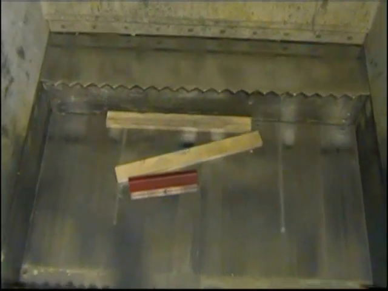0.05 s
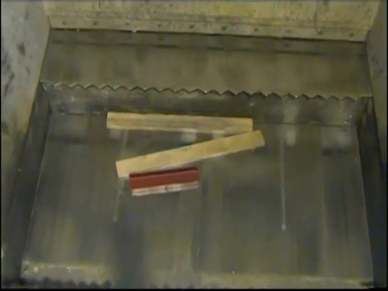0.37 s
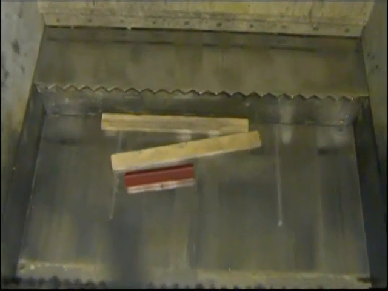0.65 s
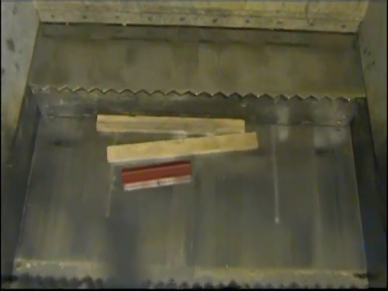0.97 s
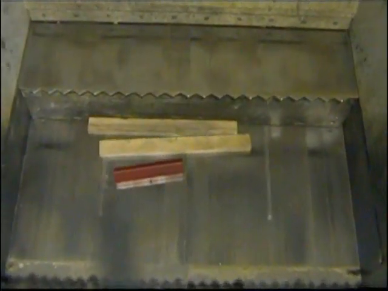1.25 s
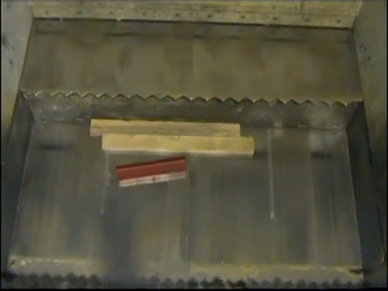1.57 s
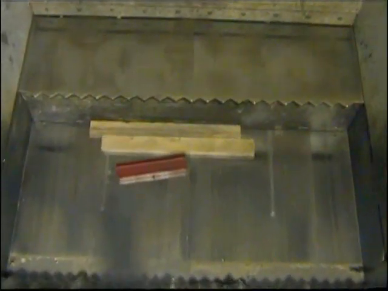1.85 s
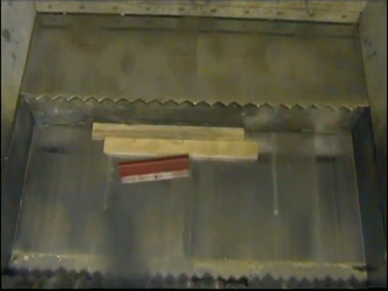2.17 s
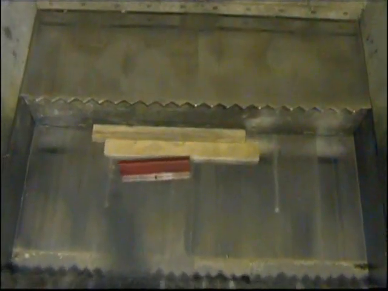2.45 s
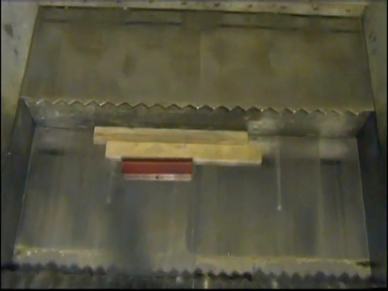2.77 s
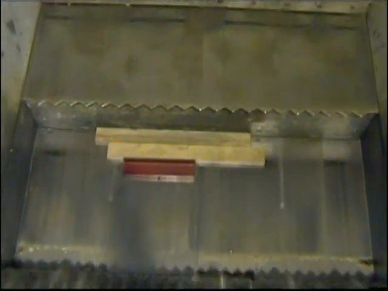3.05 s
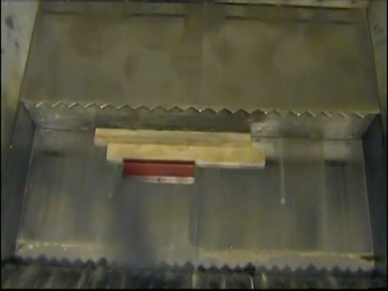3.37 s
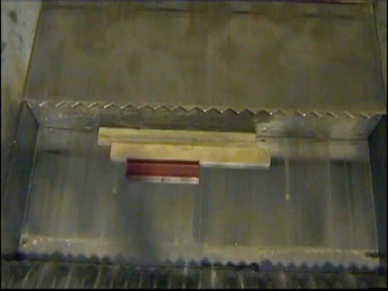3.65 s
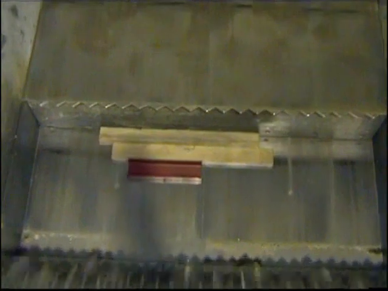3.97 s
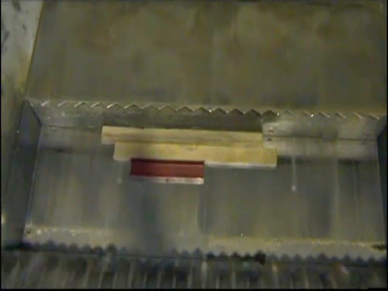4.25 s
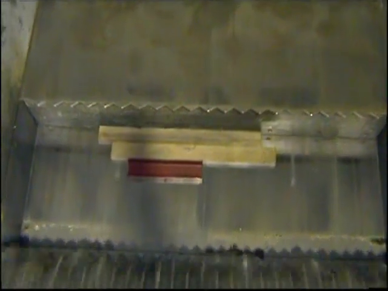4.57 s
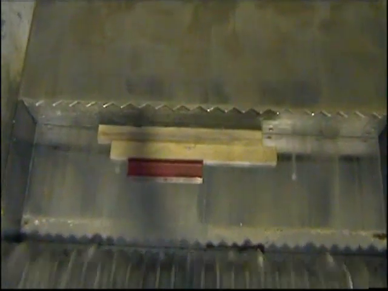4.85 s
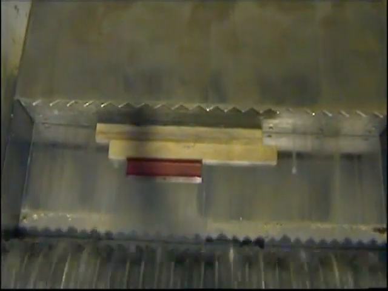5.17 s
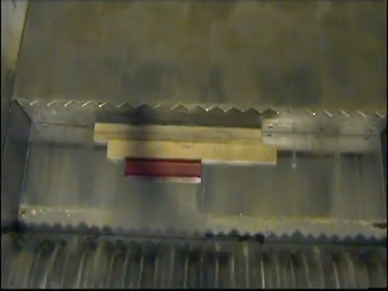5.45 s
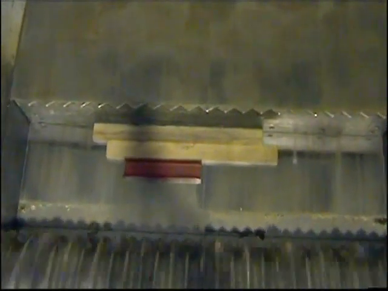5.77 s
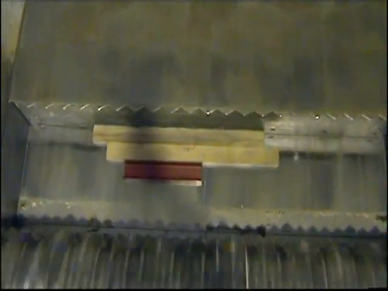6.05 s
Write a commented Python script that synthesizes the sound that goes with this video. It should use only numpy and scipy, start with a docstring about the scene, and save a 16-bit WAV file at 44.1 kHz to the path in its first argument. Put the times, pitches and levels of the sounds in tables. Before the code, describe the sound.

Heard close over a steel hopper in a plant, a shredder's rotor turns with a steady rumble and a fast, regular metallic scraping that makes the housing ring hollowly. A wavering gear hum, a high throbbing motor whine and tiny irregular squeaks run through it. In the last seconds the machine works a little harder and the rumble thickens slightly.

```python
"""The rotor of an industrial shredder rumbles at 170 turns a minute, heard from above the steel hopper.
Twice a turn it rubs on steel, and the friction drives the housing's resonances. Gear teeth hum at their
meshing rate, the motor's inverter whines, a dry bearing squeaks, and the hall rumbles behind.
The machine works harder in the last seconds, as its ram slides wood toward the rotor."""
import sys
import numpy as np
from scipy import signal
from scipy.fft import rfft, irfft
from scipy.io import wavfile

SR = 44100
rng = np.random.default_rng(int(sys.argv[2]) if len(sys.argv) > 2 else 0)


def generate_wav(sig):
    """Save sig (samples, or channels by samples) to the path in sys.argv[1] as 16-bit PCM at SR."""
    pcm = np.round(np.clip(np.atleast_2d(sig).T, -1, 1) * 32767).astype(np.int16)
    wavfile.write(sys.argv[1], SR, pcm)


N = 273420
T = np.arange(N) / SR
FREQS = np.maximum(np.arange(N // 2 + 1) * SR / N, 1)
TURN_S = .3529


def undb(db):
    """Amplitude ratio of a level in decibels."""
    return 10 ** (np.asarray(db) / 20)

def unit(x):
    """Normalisation to an rms of 1."""
    return x / np.sqrt(np.mean(x ** 2))

def curve(table):
    """Linear interpolation of (seconds, value) rows at every sample."""
    return np.interp(T, *np.transpose(table))

def over_hz(points):
    """Interpolation of (Hz, value) rows along a logarithmic frequency axis."""
    hz, value = np.transpose(points)
    return np.interp(np.log(FREQS), np.log(hz), value)

def colour(x, points):
    """Filtering by a spectral envelope, at unit rms."""
    return unit(irfft(rfft(x) * undb(over_hz(points)), N))

def resonate(x, modes):
    """Forced response of damped modes (Hz, bandwidth in Hz, relative dB), at unit rms."""
    response = sum(undb(db) / (1 + 1j * (FREQS / hz - hz / FREQS) * hz / width)
                   for hz, width, db in modes)
    cutoff_hz = 1.4 * max(hz for hz, width, db in modes)
    return unit(irfft(rfft(x) * response / (1 + (FREQS / cutoff_hz) ** 8), N))

def drift(rate_hz):
    """Low-pass Gaussian noise: a random fluctuation of unit rms."""
    return unit(irfft(rfft(rng.standard_normal(N)) * np.exp(-(FREQS / rate_hz) ** 2), N))

def tone(hz, waver):
    """A sinusoid under slow random phase and amplitude modulation."""
    phase = 2 * np.pi * (hz * T + rng.random()) + waver * drift(17)
    return np.sqrt(2) * np.sin(phase) * undb(6.9 * waver * drift(2.6))

def rotor_tones(orders):
    """Rotational orders: tones at whole multiples of the turning rate."""
    return sum(undb(db) * tone(round(order) / TURN_S, waver=.35) for order, db in orders)

def roughness(memory, fresh):
    """Quasi-periodic force: bumps recur each turn with correlation `memory`, mixed with fresh noise."""
    size = round(TURN_S * SR)
    turns = rng.standard_normal((N // size + 1, size))
    keep = min(memory, .995)
    for k in range(1, len(turns)):
        turns[k] = keep * turns[k - 1] + np.sqrt(1 - keep ** 2) * turns[k]
    return np.sqrt(1 - fresh) * turns.ravel()[:N] + np.sqrt(fresh) * rng.standard_normal(N)

def contact(age, rise, hold, decay):
    """Contact pressure: linear rise, plateau and exponential decay, timed in seconds."""
    return np.clip(age / rise, 0, 1) * np.exp(-np.maximum(age - rise - hold, 0) / decay)

def bump(offset, width):
    """A Gaussian pulse of height 1."""
    return np.exp(-(offset / width) ** 2)

def load(midpoint_s=4.35, rise_s=.9):
    """Mechanical load: a ramp from 0 at idle to 1 with the ram close to the rotor."""
    return np.clip((T - midpoint_s) / rise_s + .5, 0, 1)


# Spectrum of the rumble. Each row: frequency in Hz, relative density in dB.
RUMBLE_SPECTRUM = [(100, -15.5), (170, -1), (250, 7), (450, 7.5), (750, 6.5), (1000, 4), (1600, 3.5),
                   (2500, -4.5), (3700, -3.5), (4800, -13), (5600, -28), (6150, -5), (6500, -66),
                   (7800, -66)]
# Low modes of the housing. Each row: frequency in Hz, bandwidth in Hz, relative gain in dB.
LOW_MODES = [(316.6, 12, 2), (349, 25, 13.5), (395.4, 14, 6)]

def rotor():
    """Forced vibration: the rotor shakes the housing into a rumble and a drone that grow with load."""
    rumble = colour(roughness(memory=.927, fresh=.59), RUMBLE_SPECTRUM)
    drone = resonate(roughness(memory=.88, fresh=.074), LOW_MODES)
    return rumble * undb(-29.5 + 1.5 * load()) + drone * undb(-37.5 + 3.5 * load())


# Swells of the mesh fundamental. Each row: time in seconds, level in dB.
HUM_LEVELS = [(0, -37), (.24, -26.5), (.75, -22), (1.28, -22.5), (1.62, -25.5), (1.9, -32), (2.17, -22),
              (2.48, -39.5), (2.68, -40.5), (2.81, -25.5), (3.14, -24.5), (3.33, -20), (3.5, -28.5),
              (4.3, -31.5), (5.3, -27.5), (5.8, -25), (6.2, -37)]
# Overtones of the mesh. Each row: harmonic number, level in dB.
MESH_HARMONICS = [(2, -38.5), (3, -48.5), (4, -46), (5, -49.5), (6, -51.5), (9, -57.5), (10, -53),
                  (20, -59)]
# Tones locked to the rotor. Each row: cycles per turn, level in dB.
DRIVE_ORDERS = [(48, -53.5), (128, -39), (144, -48), (266, -47.5), (277, -49.5), (288, -49)]

def gears(mesh_hz=272.85):
    """Periodic tooth contact gives a harmonic series, whose fundamental swells and fades."""
    hum = tone(mesh_hz, waver=.014) * undb(curve(HUM_LEVELS))
    overtones = sum(undb(db) * tone(round(k) * mesh_hz, waver=.065) for k, db in MESH_HARMONICS)
    return hum + overtones + rotor_tones(DRIVE_ORDERS)


# Switching tones. Each row: carrier multiple, sideband number, idle level in dB, load change in dB.
SIDEBANDS = [(1, -1, -46, 6.5), (1, 1, -39.5, 1), (1, 3, -54.5, -0.5), (2, -2, -65, 11), (2, 2, -50, 0.5),
             (3, -1, -61, 1), (3, 1, -54.5, -5)]
# Swells of the main whine. Each row: time in seconds, relative level in dB.
WHINE_LEVELS = [(0, -36.5), (.4, -34.5), (.7, -35.5), (1.75, -34.5), (1.9, -28), (2.07, -33.5),
                (2.25, -28.5), (2.4, -32), (2.6, -28.5), (2.72, -32), (3.2, -33), (4.3, -33.5),
                (4.85, -30.5), (5.05, -35), (5.2, -28.5), (5.43, -31), (5.97, -35), (6.15, -31)]

def inverter(carrier_hz=1999.3, sideband_hz=102.2, throbs_per_turn=4):
    """Modulated switching gives sidebands; the whine at twice the carrier throbs as the shaft turns."""
    working = load(midpoint_s=3.55, rise_s=.5)  # these tones shift before the rumble grows
    sidebands = 0
    for multiple, side, db, load_db in SIDEBANDS:
        hz = round(multiple) * carrier_hz + round(side) * sideband_hz
        sidebands += undb(db + load_db * working) * tone(hz, waver=.14)
    flutter = resonate(roughness(memory=.97, fresh=.02), [(4005, 48, 0)])
    throb = 1 + .22 * np.cos(2 * np.pi * throbs_per_turn * (T - .087) / TURN_S)
    whine = throb * (undb(-2.3) * tone(2 * carrier_hz, waver=.25) + undb(-2) * flutter)
    flicker_db = .43 * drift(4.5)
    return sidebands + whine * undb(curve(WHINE_LEVELS) + flicker_db)


# Spectrum of the hall's rumble. Each row: frequency in Hz, relative density in dB.
HALL_SPECTRUM = [(20, -13), (40, -24.5), (58, -22), (68, -8.5), (76, -13.5), (86, -7.5), (100, -11.5),
                 (125, -6.5), (140, -5.5), (156, -6.5), (168, -3.5), (220, -4), (400, -5), (1000, -100)]
# Wavering of the fan's hum. Each row: time in seconds, level in dB.
FAN_LEVELS = [(0, -44), (1.1, -62), (1.6, -47), (2.1, -43.5), (2.5, -67.5), (3.1, -47.5), (4.1, -67),
              (5.2, -41.5), (5.7, -58.5), (6.2, -49)]

def hall(fan_hz=142.2):
    """Ambient noise: a continuous low spectrum with one tonal component from a fan."""
    rumble = undb(-43.5) * colour(rng.standard_normal(N), HALL_SPECTRUM) * undb(.81 * drift(3.6))
    return rumble + undb(curve(FAN_LEVELS)) * tone(fan_hz, waver=.33)


# Rubs, weak and strong in turn. Each row: start in seconds, relative rasp, bite and ring levels in dB.
ROTOR_RUBS = [(0.049, -28, -40, -36), (0.223, -25.5, -41.5, -31.5), (0.401, -27.5, -47.5, -37),
              (0.575, -24.5, -41.5, -33.5), (0.758, -28.5, -38, -36), (0.931, -25, -49.5, -34.5),
              (1.107, -28, -41, -39), (1.286, -25.5, -38.5, -32), (1.46, -28, -41, -38.5),
              (1.638, -25.5, -40, -32), (1.813, -28.5, -40.5, -34), (1.991, -26, -38, -35),
              (2.164, -28, -46, -35.5), (2.344, -26, -39, -31), (2.519, -28, -42.5, -41),
              (2.694, -26.5, -40, -32.5), (2.875, -29, -35, -37), (3.05, -28.5, -40.5, -34),
              (3.225, -26.5, -45.5, -35), (3.402, -25.0, -38.5, -32), (3.576, -29, -55, -40),
              (3.755, -26, -40, -36.5), (3.931, -28.5, -46, -39), (4.109, -27.5, -44, -34),
              (4.287, -26.5, -38.5, -38), (4.46, -25.5, -42, -32), (4.64, -29.5, -40, -40),
              (4.814, -26, -37, -31.5), (4.988, -29, -39.5, -36.5), (5.165, -26.5, -43.5, -32.5),
              (5.342, -28.5, -54, -42), (5.518, -25.5, -45.5, -33), (5.703, -31, -36, -34.5),
              (5.87, -25, -51.5, -32.5), (6.049, -28.5, -52, -35.5)]
# Envelopes of the weak and the strong rasp. Each row: hold in seconds, decay time in seconds.
RASP_SHAPES = [(.007, 0.053), (.011, 0.052)]
# Stray scratches. Each row: start in seconds, relative rasp and bite levels in dB.
STRAY_SCRATCHES = [(3.04, -35.5, -45.5), (4.116, -37.5, -48), (5.752, -25.5, -38.5)]
# Spectra of the rasp and its bright bite. Each row: frequency in Hz, relative density in dB.
RASP_SPECTRUM = [(400, -18.5), (800, -5.5), (1500, 9.5), (2300, 4), (3100, 7.5), (3750, 11.5), (4200, 5),
                 (4600, -3), (5000, -0.5), (5450, 5.5), (6000, -0.5), (6400, -5.5), (7000, -43.5),
                 (7800, -78.5)]
BITE_SPECTRUM = [(2000, -35.5), (4000, -9.5), (5200, -5.5), (5750, 9), (6350, -3.5), (6800, 7.5),
                 (7300, -5), (7800, -13.5)]
# Hollow modes of the housing. Each row: frequency in Hz, bandwidth in Hz, relative gain in dB.
HOLLOW_MODES = [(526.4, 9.8, 3.5), (556, 12, -9), (636, 12, 9), (740, 490, -2)]
# Rotor tones that throb with those modes. Each row: cycles per turn, relative level in dB.
HOLLOW_ORDERS = [(182, -6.5), (185, -9.5), (204, -2), (208, -9), (210, -10.5), (216, -2), (226, -15)]

def rubbing(bite_lead_s=.0072, graze_lead_s=.017):
    """Sliding friction: twice a turn the rotor bites and rasps on steel, exciting the housing's modes."""
    rasp_gain, bite_gain = 0, 0
    ring_gain = undb(-45.5)  # the housing rings softly between rubs
    for place, (hold, decay) in enumerate(RASP_SHAPES):
        rubs = np.array(ROTOR_RUBS)[place::2]
        latest = np.maximum(np.searchsorted(rubs[:, 0], T + bite_lead_s) - 1, 0)
        start, rasp_db, bite_db, ring_db = rubs[latest].T
        age = T - start
        rasp_gain += undb(rasp_db) * contact(age, .026, hold, decay)
        bite_gain += undb(bite_db) * contact(age + bite_lead_s, rise=.027, hold=.0015, decay=.01)
        ring_gain += undb(ring_db) * contact(age, rise=.028, hold=.055, decay=.04)
    # a light graze precedes each rub
    rasp_gain += undb(-39.5) * sum(bump(T - start + graze_lead_s, .0073) for start, *_ in ROTOR_RUBS)
    for start, rasp_db, bite_db in STRAY_SCRATCHES:
        scratch = contact(T - start, rise=.0076, hold=.0062, decay=.036)
        rasp_gain += undb(rasp_db) * scratch
        bite_gain += undb(bite_db) * scratch
    rasp = colour(roughness(memory=.96, fresh=.76), RASP_SPECTRUM)
    edge = resonate(roughness(memory=.995, fresh=.5), [(3640, 85, .075), (2076, 87, 2)])
    sing = edge * undb(-11) * rasp_gain / rasp_gain.max()  # the edge sings as pressure squared
    bite = colour(roughness(memory=.995, fresh=.47), BITE_SPECTRUM)
    ring = undb(-2) * resonate(roughness(memory=.888, fresh=.23), HOLLOW_MODES)
    ring += rotor_tones(HOLLOW_ORDERS)
    return rasp_gain * (rasp + sing) + bite_gain * bite + ring_gain * ring * undb(-.6 - 2.3 * load())


# Squeaks of the bearing. Each row: peak time in seconds, pitch in Hz, half width in seconds, level in dB.
BEARING_SQUEAKS = [(0.223, 2109, 0.0074, -25), (0.547, 2104, 0.011, -24), (0.898, 2110, 0.0055, -20),
                   (0.932, 2075, 0.0037, -24.5), (1.25, 2110, 0.0078, -21), (1.49, 2105, 0.0082, -23.5),
                   (1.604, 2113, 0.014, -21.5), (1.956, 2101, 0.011, -21), (2.134, 2110, 0.0064, -22.5),
                   (2.31, 2076, 0.012, -21.5), (2.663, 2086, 0.0099, -20.5), (3.016, 2096, 0.012, -22),
                   (3.169, 2090, 0.0051, -22), (3.37, 2080, 0.025, -24), (3.722, 2099, 0.016, -21.5),
                   (3.788, 2081, 0.009, -30), (3.873, 2064, 0.02, -25.5), (3.937, 2100, 0.006, -24.5),
                   (4.072, 2112, 0.021, -25), (4.291, 2080, 0.018, -26), (4.447, 2096, 0.017, -23),
                   (4.565, 2080, 0.012, -23.5), (4.642, 2106, 0.0061, -22), (4.801, 2087, 0.013, -22),
                   (4.913, 2091, 0.012, -24), (4.998, 2076, 0.0084, -24), (5.155, 2083, 0.019, -25.5),
                   (5.264, 2120, 0.0097, -23), (5.51, 2090, 0.0076, -21), (5.549, 2091, 0.0081, -22.5),
                   (5.62, 2086, 0.011, -22.5), (5.86, 2104, 0.0082, -21), (5.972, 2080, 0.017, -25.5)]

def bearing(mode_hz=2104):
    """Friction-excited resonance: a dry bearing sings faintly and at times locks into a short squeak."""
    squeaks, grip = 0, 0
    judder = .1 * drift(110)  # phase modulation roughens the squeaks
    for peak_s, hz, width, db in BEARING_SQUEAKS:
        swell = undb(db) * bump(T - peak_s, width)
        squeaks += swell * np.sqrt(2) * np.sin(2 * np.pi * (hz * T + rng.random()) + judder)
        grip += swell
    sing = undb(-32) * resonate(roughness(memory=.9, fresh=.042), [(mode_hz, 60, 0)])
    return sing * np.exp(-grip / undb(-23.5)) + squeaks


def hopper(x, t60=.14):
    """Reverberation: dense reflections between the steel walls decay exponentially."""
    age = T[:SR // 2]
    echoes = rng.standard_normal(len(age)) * np.exp(-np.log(1000) * age / t60)
    return signal.fftconvolve(x, echoes / np.linalg.norm(echoes))[:N]


# Sound field at two close points. Each row: frequency in Hz, left minus right level in dB,
# phase lead of the left in radians, gain in dB of the reflections that differ between them.
STEREO_FIELD = [(35, 0, -2.1, -20), (50, 0, -2.75, -20), (90, -.5, -2.85, -20), (130, -3.5, -2.8, -20),
                (220, -8.5, -2.3, -16), (273, -11, -1.6, -24), (350, -11, -.8, -15), (500, -6, -.35, -12.5),
                (800, -2.3, .05, -11.5), (2000, -1.4, .35, -8), (4000, -1.1, .62, -6), (6000, -.5, .95, -5)]

def scene():
    """Superposition at two close points: the bass is nearly in antiphase and the reflections differ."""
    steady = gears() + bearing() + hall()
    mid = steady + rotor() + rubbing() + inverter()  # the whine arrives only directly
    reflected = hopper(steady + rotor() + rubbing())  # walls return noise from other parts of the rotor
    hz, *columns = np.transpose(STEREO_FIELD)
    balance_db, lead, echo_db = (over_hz(np.c_[hz, column]) for column in columns)
    left_over_right = undb(balance_db) * np.exp(1j * lead)
    direct_side = rfft(mid) * (left_over_right - 1) / (left_over_right + 1)
    side = irfft(direct_side + rfft(reflected) * undb(echo_db), N)
    return np.array([mid + side, mid - side])

def record(dry, cutoff_hz=7800):
    """Band limiting: a steep elliptic low-pass filter removes the top treble."""
    return signal.sosfilt(signal.ellip(10, .2, 80, cutoff_hz, fs=SR, output="sos"), dry)


dry = scene()
out = record(dry)
generate_wav(out)
```